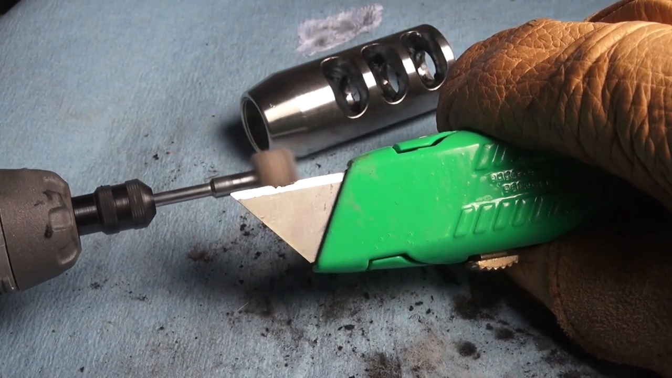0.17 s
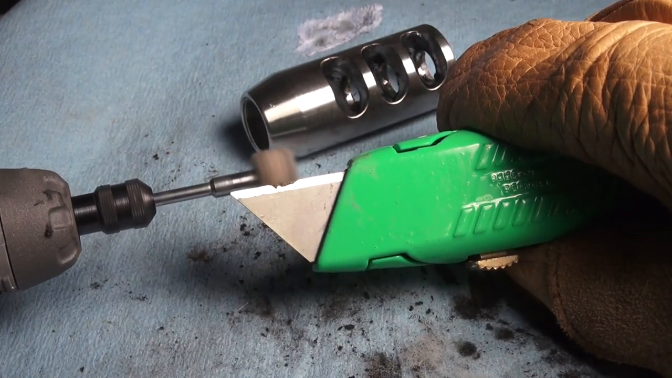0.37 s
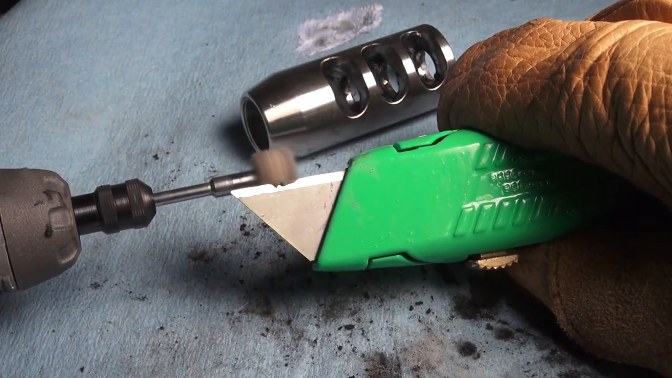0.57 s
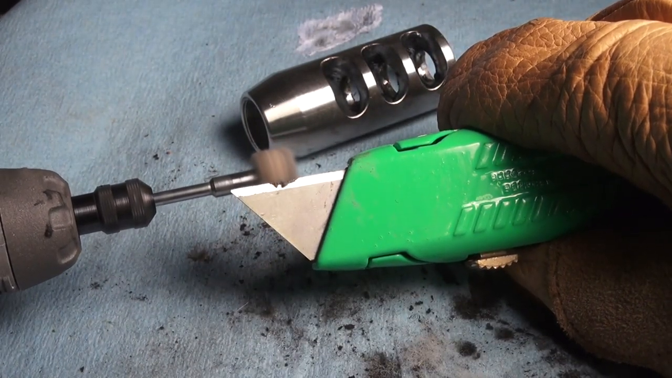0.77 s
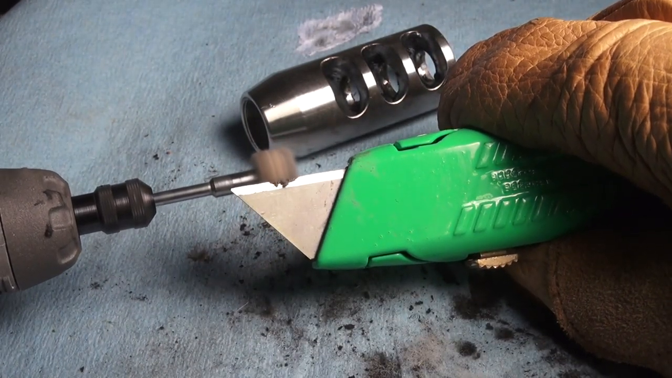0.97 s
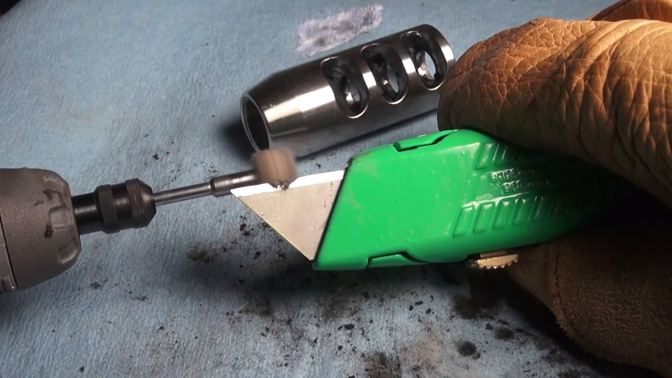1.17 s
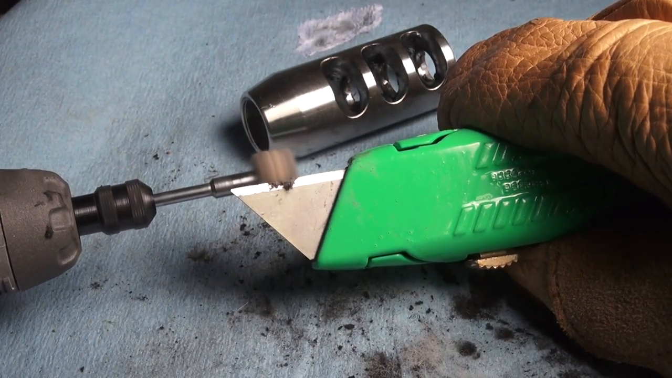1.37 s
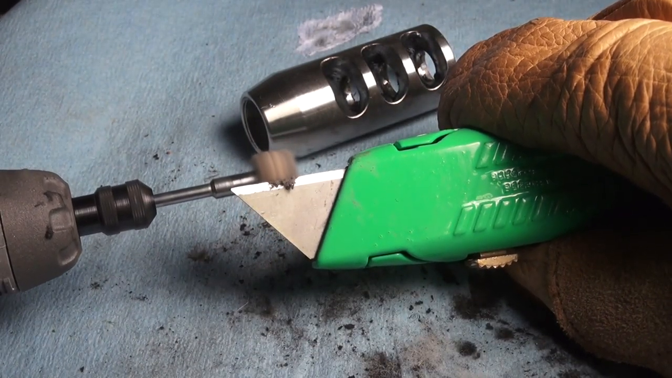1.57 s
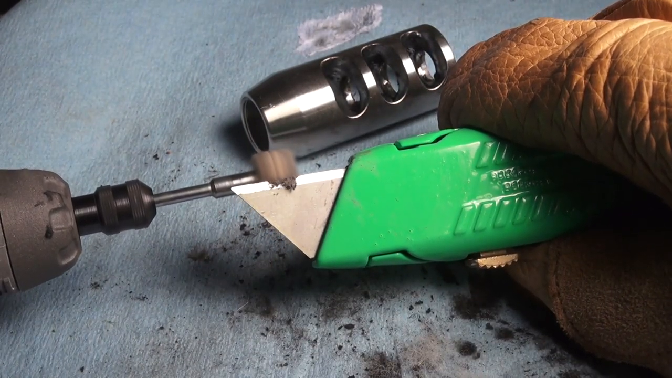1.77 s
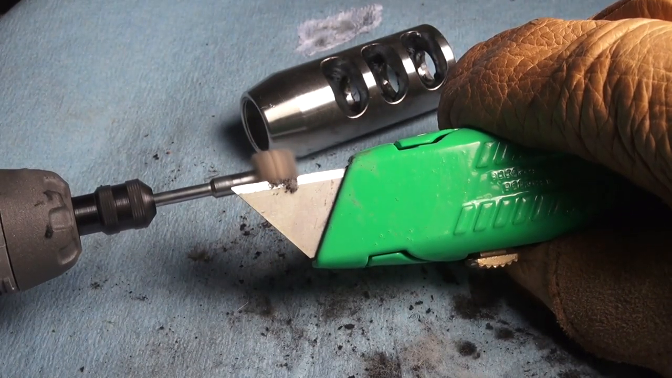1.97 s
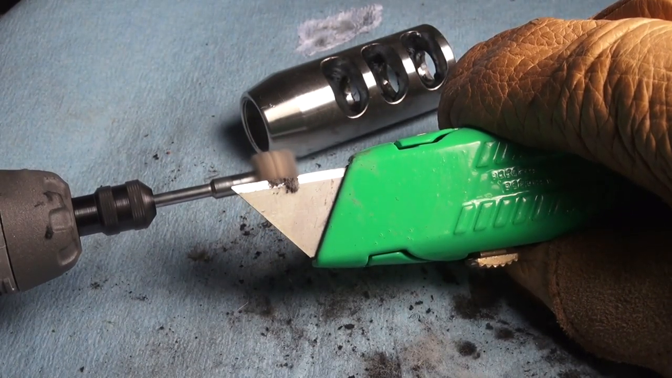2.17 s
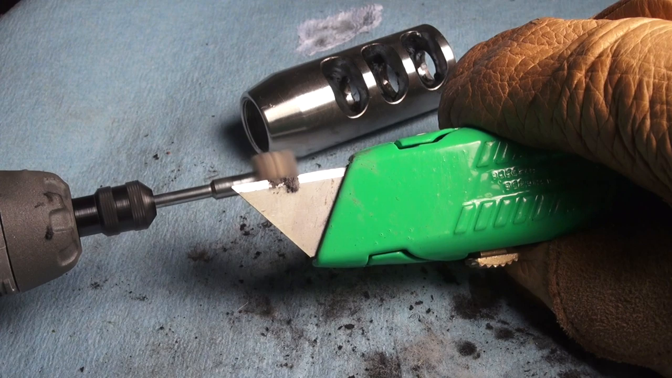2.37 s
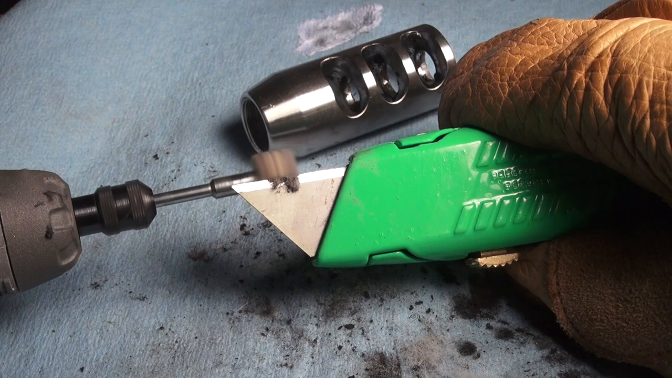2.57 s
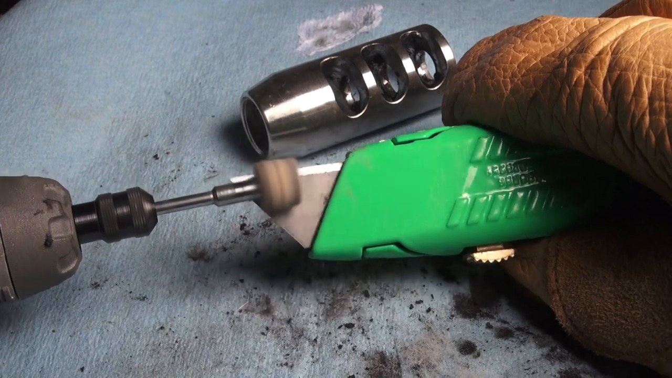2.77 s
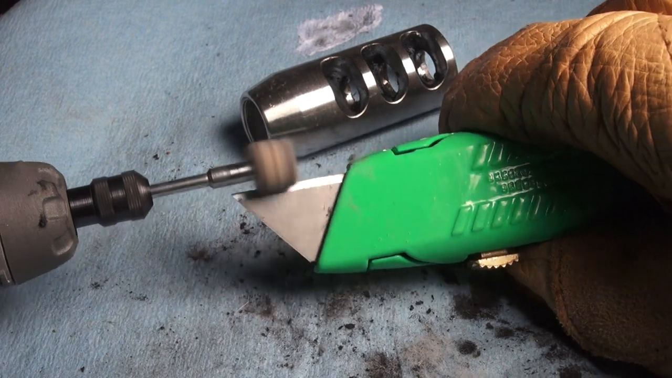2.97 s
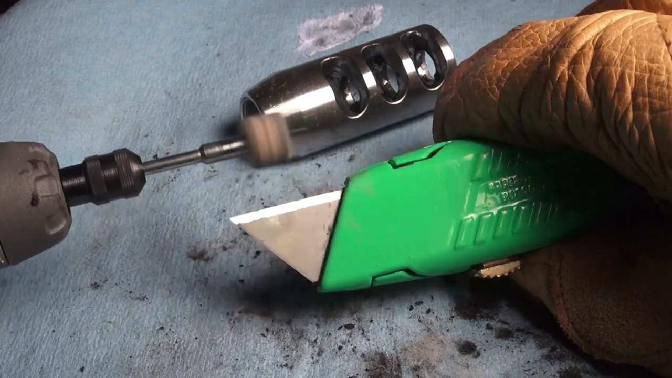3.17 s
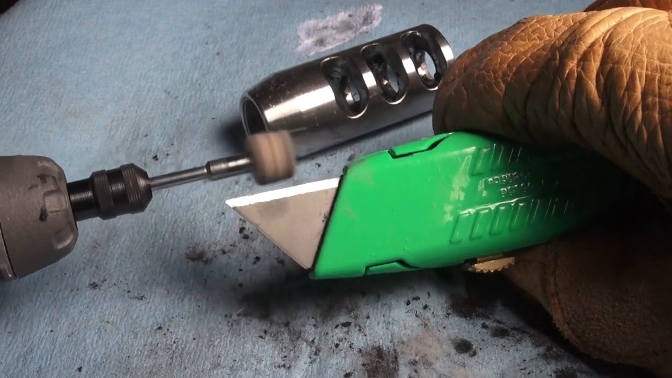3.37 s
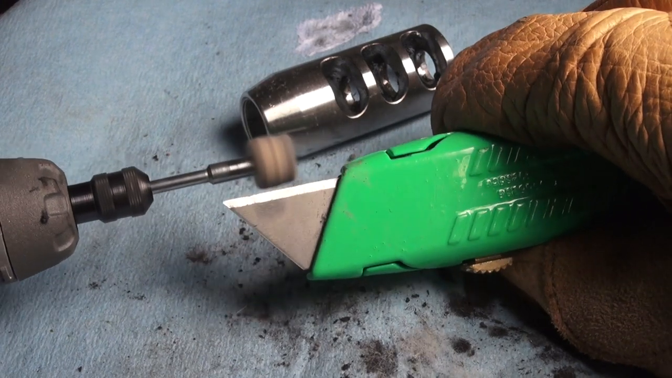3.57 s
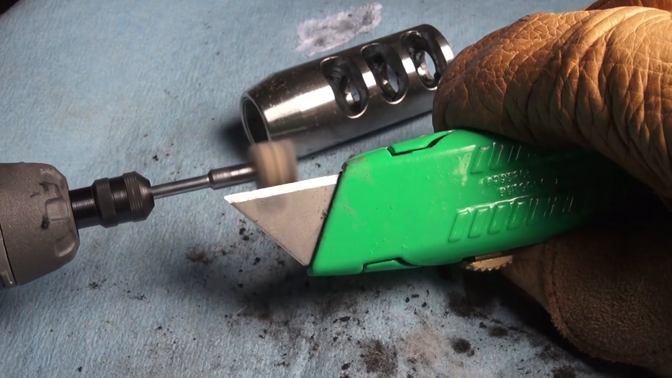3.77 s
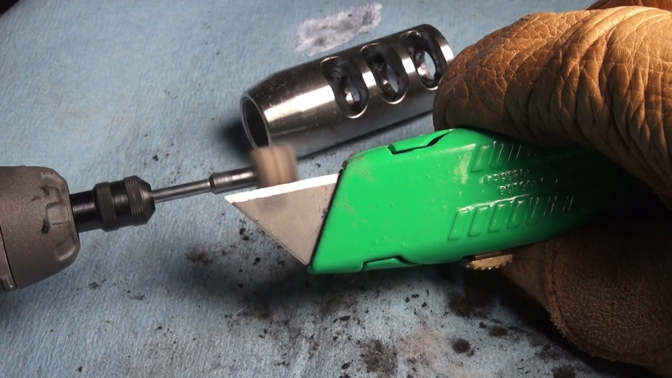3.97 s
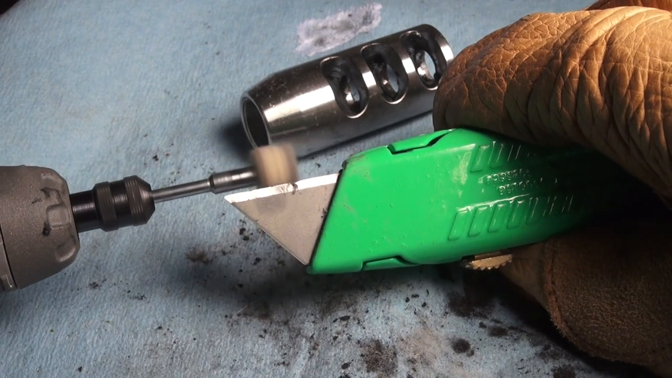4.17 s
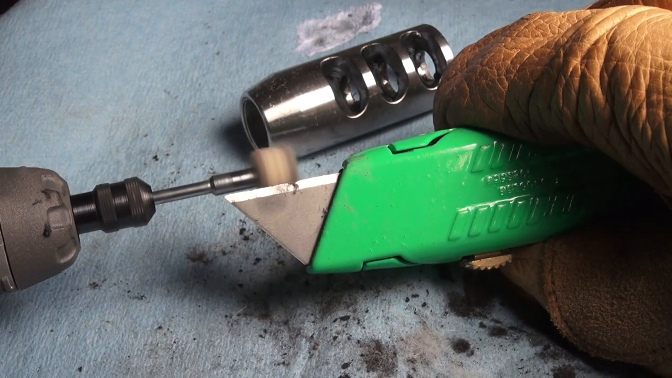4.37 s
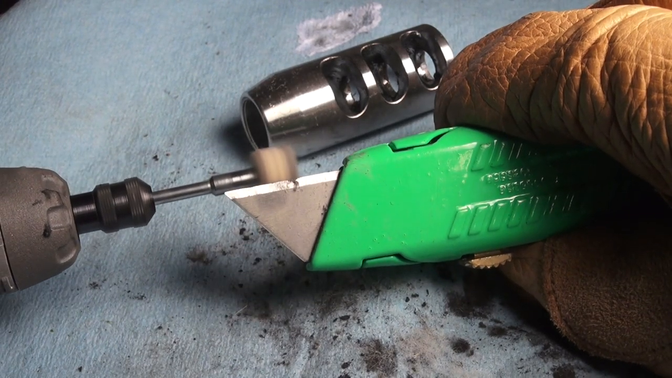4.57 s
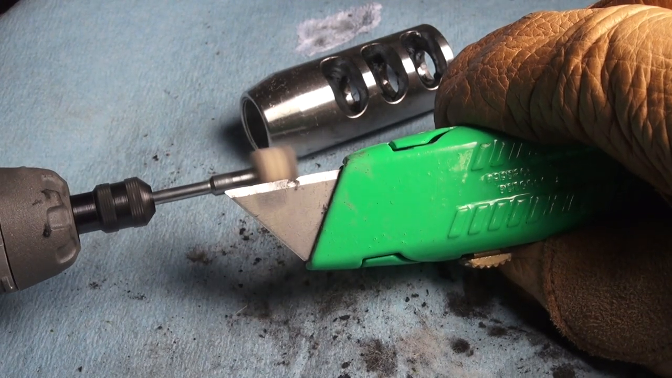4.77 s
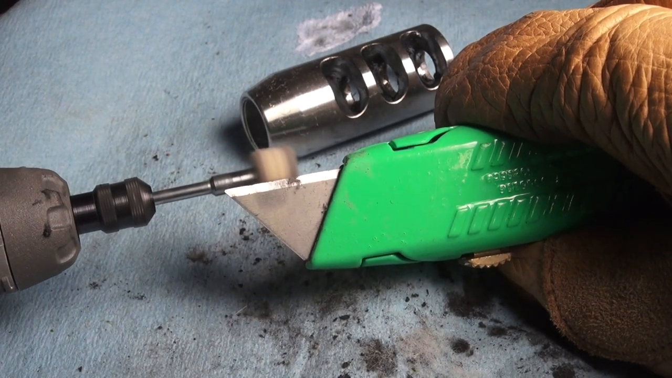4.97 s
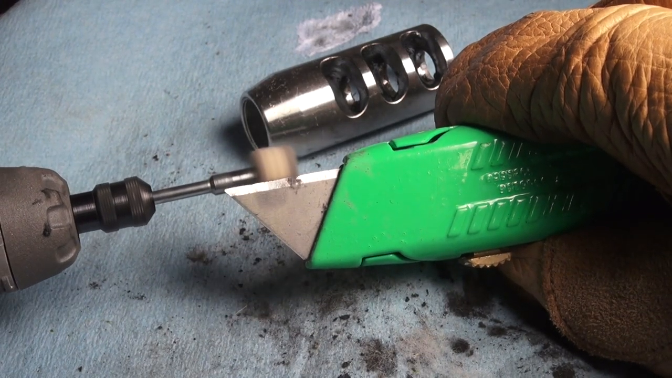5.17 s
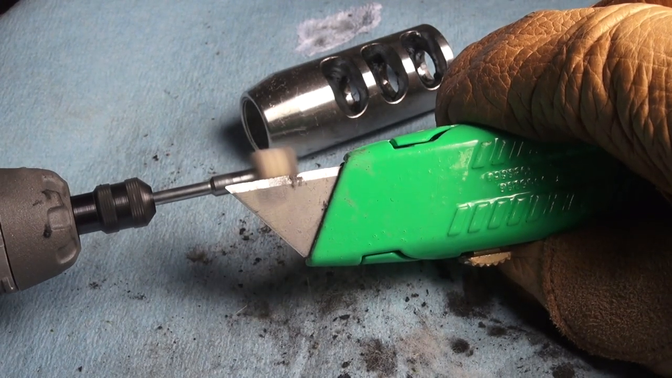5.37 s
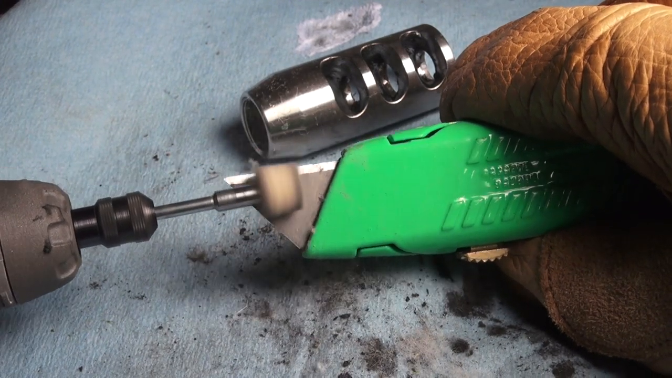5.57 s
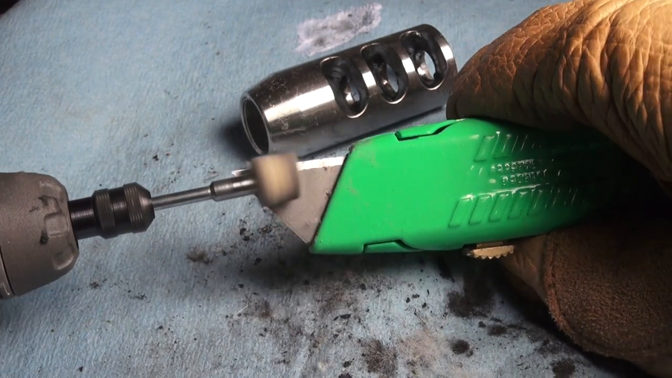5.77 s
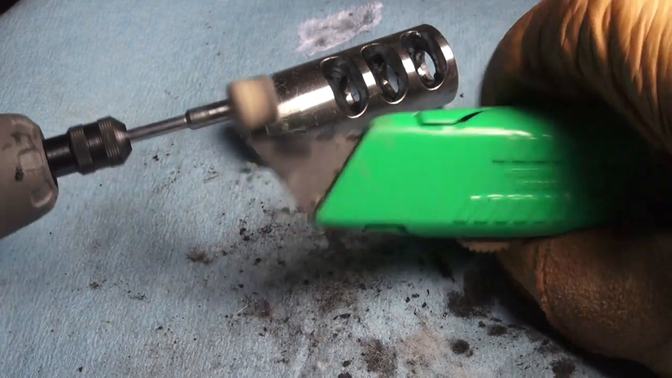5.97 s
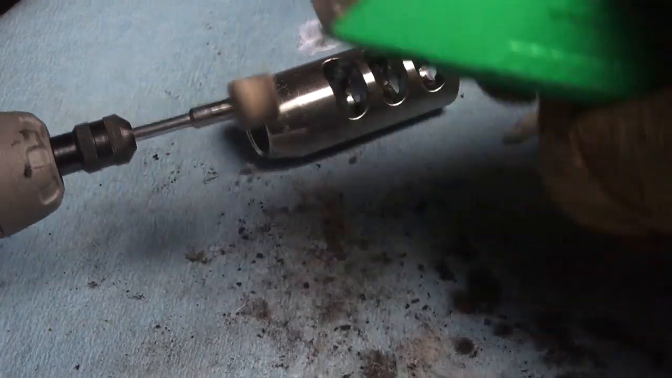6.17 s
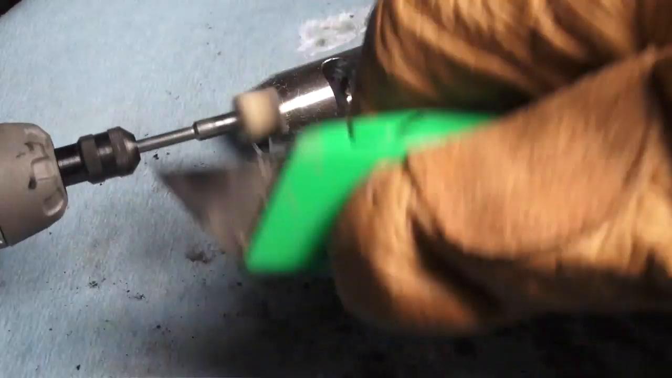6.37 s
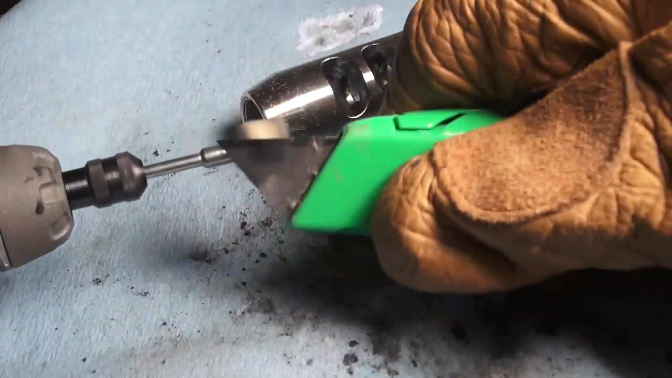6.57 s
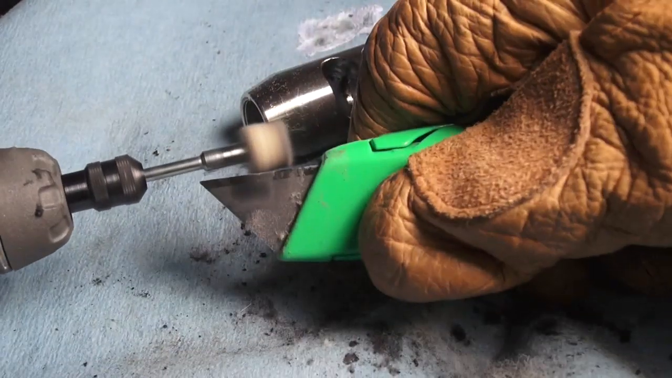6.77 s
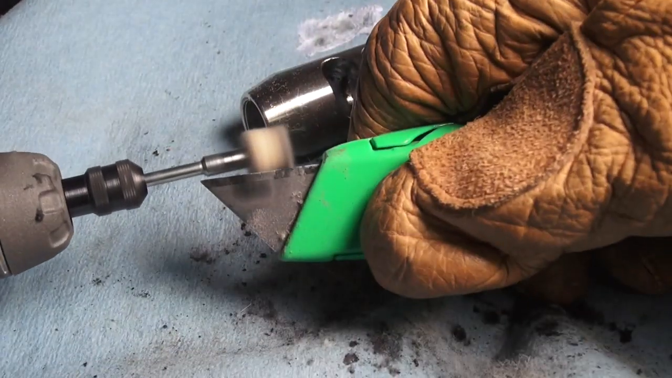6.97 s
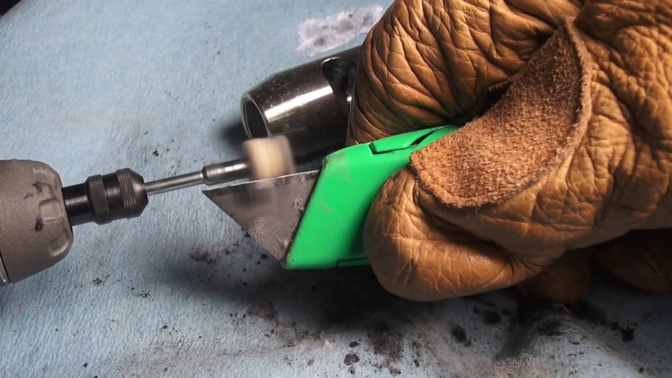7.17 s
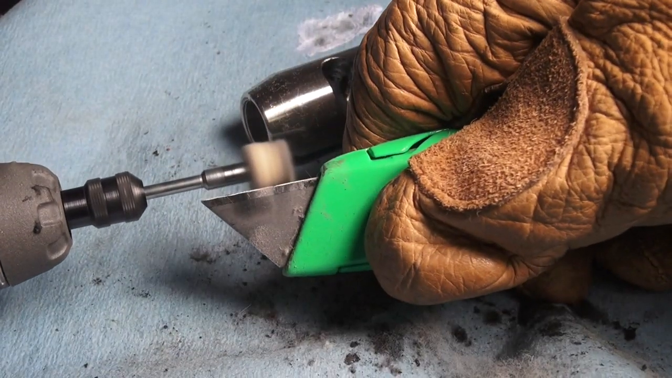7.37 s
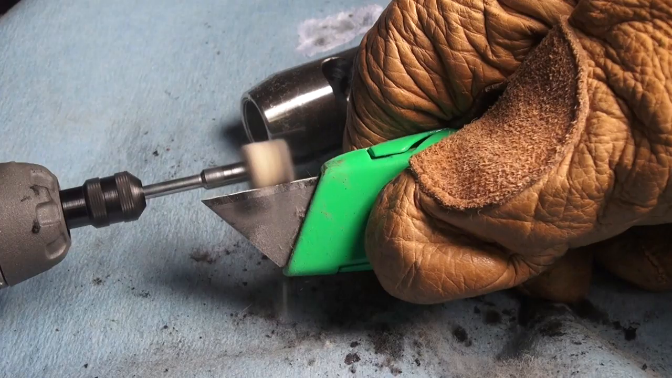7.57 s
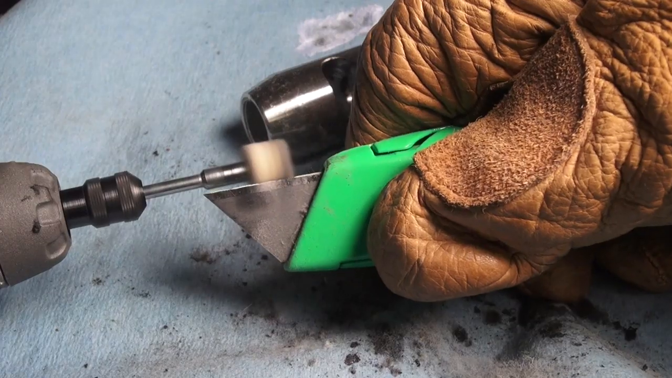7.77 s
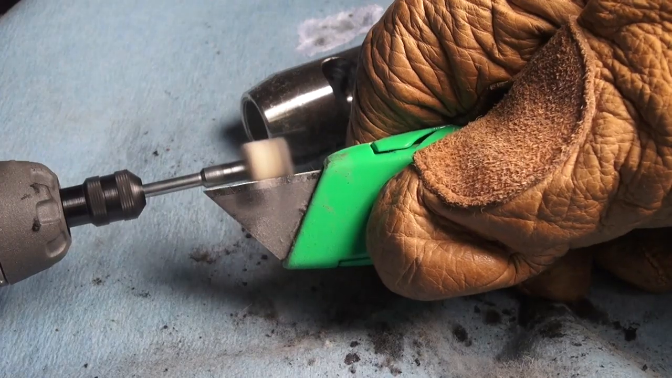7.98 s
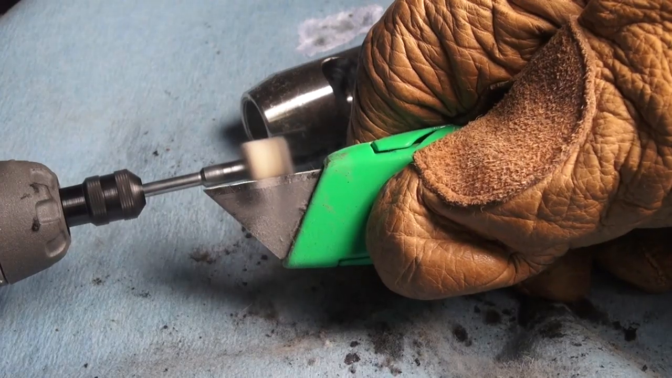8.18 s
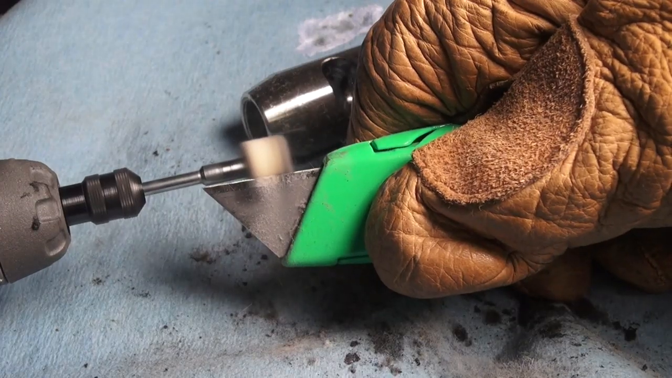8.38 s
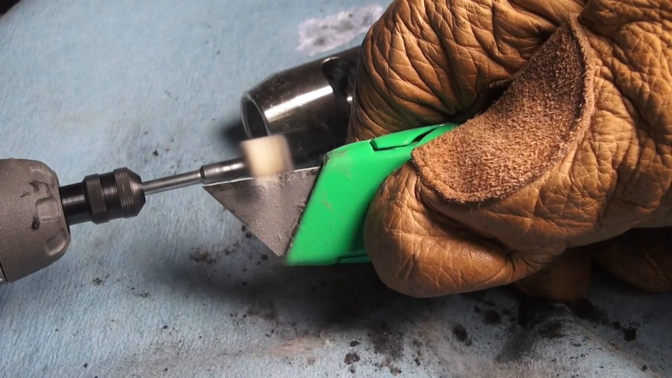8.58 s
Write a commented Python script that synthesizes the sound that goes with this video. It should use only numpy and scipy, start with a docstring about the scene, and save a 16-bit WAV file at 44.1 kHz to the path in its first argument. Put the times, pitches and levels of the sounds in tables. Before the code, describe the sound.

A small rotary tool whines at high speed while its spinning felt bob buzzes and rasps on a thin steel blade, grabbing harshly twice.

```python
"""A mains rotary tool spins a felt bob on a workbench, left of the microphone, against a hand-held knife blade.
The felt's high spot strikes and rasps the blade once a turn; the shaft sags under load and the bob grabs hard twice.
Between strokes the motor whines freely over mains hum and fan noise, and the knife clicks as it is turned over.
The bench rumbles faintly and thuds; the sound spreads left and right, with its highest treble centred."""
import sys
import numpy as np
from scipy import signal
from scipy.fft import rfft, irfft, next_fast_len
from scipy.io import wavfile
from scipy.ndimage import map_coordinates

SR = 44100
rng = np.random.default_rng(int(sys.argv[2]) if len(sys.argv) > 2 else 0)


def transcribe(u):
    """Save the signal u as a 16-bit wav file named by the first command-line argument.

    u: samples, shape (n,) or (channels, n), limited to [-1, 1]; the rate is SR.
    q: integer samples, one column per channel.
    """
    v = np.clip(np.atleast_2d(u).T, -1, 1)
    q = np.round(v * 32767).astype(np.int16)
    wavfile.write(sys.argv[1], SR, q)


N = 381024

# Levels are those at the source, before placing; rms levels are centres where a drift is added.
# speed of the shaft: [t/s, turns per s]
SHAFT_SPEED = [(0.0, 130.8), (0.24, 129), (0.34, 130.2), (0.44, 130.9), (0.52, 130.1), (0.65, 129.6),
               (0.8, 130.4), (0.87, 129.1), (0.96, 128.8), (1.02, 129.4), (1.07, 129.2), (1.12, 129.6),
               (1.27, 129.3), (1.37, 127.2), (1.44, 126.8), (1.51, 127.3), (1.6, 128.8), (1.66, 129.1),
               (1.75, 128.8), (1.83, 128.9), (1.94, 128.5), (2.01, 127.6), (2.09, 127.3), (2.17, 126.4),
               (2.21, 126.5), (2.29, 126.1), (2.36, 126.9), (2.42, 127.1), (2.47, 127.8), (2.73, 128),
               (2.78, 127.6), (2.84, 126.2), (2.89, 116.3), (2.91, 115.2), (2.93, 118.2), (2.98, 118.7),
               (3.07, 115.9), (3.15, 120.3), (3.22, 126.8), (3.3, 130.1), (3.44, 131.7), (3.66, 132.1),
               (4.11, 132.2), (4.21, 130.4), (4.28, 128.2), (4.31, 126), (4.35, 125.8), (4.4, 126.8),
               (4.45, 130), (4.57, 132.3), (4.64, 132.8), (4.86, 131.9), (4.98, 129.6), (5.03, 128.4),
               (5.13, 128), (5.21, 130.6), (5.35, 127.3), (5.42, 127.5), (5.53, 129), (5.59, 129),
               (5.63, 128.3), (5.68, 117.2), (5.7, 114.6), (5.77, 116.2), (5.85, 114.6), (5.92, 116.8),
               (6.04, 126.8), (6.16, 131.2), (6.23, 131.7), (6.44, 131.7), (6.62, 132.6), (7.2, 132.8),
               (7.25, 131.2), (7.32, 130.7), (7.48, 132.5), (7.6, 132.3), (7.65, 129), (7.77, 126),
               (7.87, 128.3), (8.02, 131.2), (8.13, 127.4), (8.23, 128.9), (8.32, 127.3), (8.38, 125),
               (8.43, 124.8), (8.54, 120.8), (8.64, 121.6)]
# commutator whine: [t/s, whine level/dB rms, octave level/dB rms]
WHINE = [(0.0, -25, -36), (0.24, -24, -34), (0.46, -25, -36.5), (0.7, -24.5, -33), (0.96, -23, -37),
         (1.2, -23, -37), (1.45, -23.5, -35), (1.8, -28.5, -48), (2.0, -28.5, -41), (2.24, -28, -38),
         (2.4, -28, -31), (2.6, -23.5, -30), (2.85, -23.5, -27), (2.89, -29, -50), (2.94, -19, -38),
         (3.0, -21, -42), (3.08, -25, -46), (3.22, -26.5, -36.5), (3.44, -30, -33), (3.66, -26.5, -34.5),
         (4.2, -27.5, -37), (4.36, -27, -45), (4.42, -30, -35), (4.6, -32, -39.5), (4.8, -30.5, -37),
         (4.92, -34, -37), (5.02, -30.5, -33), (5.1, -31, -38), (5.2, -28, -31), (5.27, -25, -25),
         (5.32, -26, -34), (5.4, -27.5, -26), (5.53, -27.5, -30), (5.62, -25, -33), (5.7, -29, -50),
         (5.77, -25, -49), (5.85, -31, -54), (5.93, -25, -36), (6.16, -28, -37), (6.23, -39, -39),
         (6.33, -42, -31), (6.45, -24.5, -33.5), (6.64, -31.5, -40), (6.88, -27.5, -33),
         (7.2, -29.5, -32.5), (7.6, -26.5, -33.5), (8.3, -29.5, -32.5), (8.45, -26, -36),
         (8.64, -21.5, -34)]
COMMUTATOR_BARS = 16
# shaft orders beside the whine, which grow as the shaft sags: [multiple of shaft speed, relative level/dB]
WHINE_NEIGHBOURS = [(17, -2), (18, 0.5), (19, -24), (20, -5)]
NEAR_DB, NEAR_DB_PER_SAG, FREE_TURNS_PER_S = -38.5, 0.47, 130.8  # sag in turns per s
# other shaft orders of the motor: [multiple of shaft speed, level/dB rms]
SHAFT_ORDERS = [(21, -55), (23, -40.5), (24, -43.5), (28, -50.5), (29, -56), (30, -51.5), (31, -52.5),
                (33, -44.5), (34, -48.5), (36, -44), (48, -48.5)]
# hum of the windings: [f/Hz, level/dB rms]
MAINS_HUM = [(120, -43.5), (240, -36.5), (360, -47), (480, -46), (600, -51.5), (720, -49.5)]
# spectrum of the brushes on the armature: [f/Hz, relative level/dB per Hz]
BRUSH_SPECTRUM = [(2500, -23), (3800, -11), (5500, -4.5), (6600, -5), (7600, -21), (8400, -18),
                  (10000, -30), (13000, -29)]
# spectrum of the cooling air: [f/Hz, relative level/dB per Hz]
FAN_SPECTRUM = [(60, -40), (120, -10.5), (180, -31.5), (240, -14), (300, -24.5), (600, -14.5), (950, -13),
                (1300, -14.5), (1750, -12.5), (2050, -10.5), (2400, -12), (3300, -19), (5000, -19.5),
                (8000, -31), (12500, -40)]

# strokes on the felt, one list each:
# [t/s, rasp level/dB, ringing edge level/dB, blade knock level/dB, tool knock level/dB], all relative
STROKES = [
    [(0.0, -46, -42, -27, -43), (0.03, -42, -36, -32, -56), (0.06, -37, -36.5, -20.5, -36),
     (0.25, -37, -26, -19, -36.5), (0.32, -42, -35, -28, -40), (0.42, -42, -33.5, -26.5, -43),
     (0.48, -38, -29.5, -21.5, -37.5), (0.64, -37, -28.5, -20, -35.5), (0.69, -42, -28.5, -26.5, -36),
     (0.79, -40, -29, -22.5, -37), (0.85, -37.5, -24, -19.5, -34), (1.11, -40, -29, -26, -36),
     (1.18, -39.5, -29.5, -28.5, -34), (1.46, -35, -30.5, -24, -29.5), (1.51, -41, -34, -28.5, -33),
     (1.81, -40.5, -30.5, -29.5, -35.5), (2.01, -37.5, -31, -25.5, -32.5), (2.33, -36, -30.5, -24.5, -32.5),
     (2.38, -40, -36, -28, -43), (2.41, -39.5, -32, -26, -30.5), (2.58, -37, -27, -30, -36),
     (2.67, -40, -31, -30, -34), (2.71, -34, -25, -31.5, -36), (2.83, -35.5, -24, -26, -29),
     (2.87, -25, -21, -15, -29), (2.9, -34, -27, -24, -27), (2.93, -31, -23, -27, -29),
     (2.98, -48, -44, -25, -31), (3.02, -31, -23, -18, -34), (3.13, -27, -17.5, -23, -23),
     (3.15, -28, -23, -29, -29), (3.16, -36, -31, -37, -43), (3.18, -56, -40, -58, -45),
     (3.2, -60, -37, -46, -52)],
    [(4.09, -51, -47, -53, -43), (4.104, -53, -43, -50, -39), (4.124, -41, -35, -38, -52),
     (4.142, -27.5, -22, -28, -32), (4.17, -37, -25, -28, -31), (4.208, -35, -33, -32, -33),
     (4.284, -30, -23.5, -18, -33.5), (4.39, -35, -24, -20, -37), (4.428, -56, -46, -40, -52),
     (4.45, -59, -45, -48, -51)],
    [(4.66, -49, -39, -42, -52), (4.666, -51, -38, -41, -48), (4.734, -37, -37, -27, -37),
     (4.802, -43, -30, -31, -41), (4.914, -35, -32, -20, -32), (5.122, -34, -32, -20, -28),
     (5.156, -44.5, -36, -28, -43), (5.232, -33, -38, -25.5, -29), (5.288, -33.5, -24, -22.5, -26.5),
     (5.524, -34.5, -28, -29, -27), (5.544, -32.5, -25, -36, -23), (5.662, -28, -13.5, -16.5, -28.5),
     (5.698, -30, -20, -33, -20), (5.73, -39, -26, -26, -27.5), (5.85, -46, -25, -38, -27),
     (5.89, -29.5, -21, -20, -25), (5.906, -32.5, -18.5, -31, -25), (6.042, -32.5, -23, -29, -36),
     (6.066, -49, -47, -52, -63), (6.09, -52, -38, -47, -51)],
    [(6.83, -61, -54, -46, -44), (6.856, -39.5, -30, -39, -46), (6.89, -60, -54, -49, -38)],
    [(7.19, -63, -54, -49, -52), (7.218, -34, -28, -34, -45), (7.23, -37, -18.5, -32, -48),
     (7.348, -40, -24.5, -31, -55), (7.386, -53, -40, -53, -54), (7.41, -63, -47, -39, -52)],
    [(7.56, -53, -40, -40, -48), (7.595, -39, -31, -29, -50), (7.598, -34, -16, -23, -52),
     (7.608, -35, -24, -26, -50), (7.64, -31, -18, -23.5, -35), (7.68, -35.5, -22.5, -25.5, -45),
     (7.778, -32.5, -18.5, -23, -30), (7.796, -37, -22, -22, -51), (7.832, -38.5, -30, -29.5, -52),
     (7.896, -36, -21.5, -24.5, -40), (7.96, -43, -34, -34, -46), (8.01, -46, -36, -31, -53),
     (8.058, -32.5, -16.5, -18.5, -40), (8.104, -35, -18.5, -18, -33), (8.148, -39.5, -22.5, -24.5, -42),
     (8.272, -36.5, -16.5, -19.5, -37), (8.35, -33.5, -24, -18, -35), (8.386, -32.5, -16, -18, -36),
     (8.42, -35, -20, -24, -35), (8.492, -33, -16, -21, -34), (8.64, -37, -21, -23, -28.5)],
]
# ways of holding the blade to the felt, all relative level/dB: [heel, belly, tip over the ringing edge;
# middle, root, shoulder over the rasp; spine, flex, bend, twist, point over the blade knock;
# collet, mandrel, handle, shell over the tool knock]
GRIPS = [(-19, -6, 0.5, 1, -1, -17, -29, -10.5, -7, -6, -26, -2, -14, -3, -22),
         (-13, 0, -3, 4, 2.5, -15, -10.5, -13, -10, -4, -24, -1.5, -18, -7.5, -12),
         (-5, -2.5, -5.5, 0, -2, -6, -13, -2, -4, -2.5, -22, -1, -24, -8.5, -19),
         (-12, -5, -6, 4, 0, 0.5, -15, -0.5, -2.5, -4.5, -14, -5, -11, -10, -24),
         (-15, -9.5, -9, 14, 5.5, -0.5, -4, -4, -5, -2.5, -3, -1.5, -8, -21, -21),
         (-6.5, -5.5, -8, 2, 3, 2.5, -12, -7, -7.5, -7, -16, -14, -1.5, -30, -17),
         (-9.5, -4, -6, -5, -10, -17, -27, -7.5, -5, 0, -17, -17, -21, -1.5, -16),
         (-8, -5, -1.5, -1, 3, -22, -17, -16, 0.5, -3.5, -21, -15, -9, -2.5, -5),
         (-7, 2, -6, 1, 0.5, -10, -25, -7.5, -9, -0.5, -11, -6, -21, -6, -18),
         (-8, -1, -7, -1, 2, 3, -10, -3, -2, -1.5, -8, -3.5, -12.5, -11.5, -16),
         (-8, -11.5, 0, -24, -21, -4, -21, -0.5, 0.5, -7, -10, -26, -26, -4, -15),
         (-11.5, -8.5, -2, -19, -16, -20, -24, -1, -3.5, -3, -20, -25, -23, -2.5, -5),
         (-13, -14, -1.5, -21, -18, -14, -25, 0.5, -1, -16, -5.5, -27, -16, -3, -6),
         (-8, -10, -12, 3, 7, 2.5, -11, -5, -9, -0.5, -14, -10, -2, -30, -29),
         (-12, -8.5, -9, 5.5, 0, 1, -5, -2.5, -3, -2, -2, 0, -9.5, -21, -21)]
# grip in use, blended from one to the next: [t/s, row of the four lists of grips]
HOLD = [(.65, 0), (.9, 1), (1.25, 1), (1.36, 2), (2.0, 2), (2.2, 3), (2.4, 3), (2.52, 4), (2.82, 4),
        (2.88, 5), (3.06, 5), (3.1, 13), (3.2, 13), (4.0, 6), (4.5, 6), (4.6, 7), (4.85, 7), (4.95, 8),
        (5.15, 8), (5.25, 9), (5.55, 9), (5.59, 14), (5.64, 14), (5.69, 5), (5.96, 5), (5.99, 13),
        (6.1, 13), (6.5, 10), (7.95, 10), (8.05, 11), (8.25, 11), (8.4, 12)]
# for each grip: [share of freshly torn fibre, before pressure and grabs add to it, 0-1]
TORN = [.03, .03, .1, .03, 0, .12, .4, .03, .2, .05, .35, .3, .4, .3, .05]
# for each grip: [turn-to-turn scatter of the rasp/dB]
CHATTER_DB = [.5, .5, 1, .5, .8, 1.2, 3.6, .5, 2, .5, 1.6, 1.4, 1.8, 1.8, .8]
# for each grip: [how far the blade leaves the felt between blows, 0-1]
FLUTTER = [.15, .15, .1, .2, .4, .75, .3, .1, .2, 0, .1, .1, .1, .45, .2]
MODE_DRIFT_DB, IDLE_DB = 1.4, -50  # random drift of each mode; floor of collet and mandrel
# the bob catches and skips: [t/s, length/s, strength 0-1]
GRABS = [(2.852, 0.063, 0.96), (3.092, 0.075, 0.08), (4.117, 0.0372, 0.4), (5.639, 0.062, 0.9)]
GRAB_EDGE_S = 0.0188
TURNED_S = 6.5  # the other face meets the felt from here
# the bent mandrel's shake: [t/s, level/dB rms]
SHAKE = [(0.0, -47), (0.04, -47), (2.76, -52), (2.81, -53), (2.89, -16.5), (3.01, -30), (3.08, -22),
         (3.15, -32), (3.34, -50), (5.58, -48), (5.7, -25), (5.75, -44), (5.97, -34), (6.18, -58),
         (6.26, -51), (8.37, -52), (8.49, -41), (8.64, -53)]
# Resonances, each a list of [f/Hz, width of the narrower section/Hz, relative level/dB].
# ringing edge at heel, belly and tip; then the other face, held differently
EDGE = [(4780, 160, 0)], [(5400, 200, 0)], [(5740, 260, 0)]
EDGE_TURNED = [(4740, 81, -1), (5010, 100, 0)], [(5270, 100, 0)], [(5615, 96, -2), (6060, 320, -11.5),
               (7260, 100, -20)]
# blade modes that the rasp drives
MIDDLE, ROOT, SHOULDER = [(3934, 230, -0.76), (4290, 126, -0.24)], [(3273, 310, 0)], [(6850, 610, 0)]
# low blade modes that the high spot knocks
SPINE, FLEX, BEND = [(1302, 146, 0)], [(1560, 85, 0)], [(1697, 112, 0)]
TWIST, POINT = [(1834, 140, 0)], [(2131, 74, 0)]
# tool modes that the high spot knocks
COLLET, MANDREL = [(1067, 71, 0)], [(742, 83, -0.42), (865, 120, -0.58)]
HANDLE, SHELL = [(512, 70, 0)], [(619, 54, 0)]
# spectrum of fibres tearing: [f/Hz, relative level/dB per Hz]
RASP_SPECTRUM = [(2000, -19.5), (4000, -11.5), (5500, -4), (6600, -11.5), (8000, -13.5), (9000, -15),
                 (10000, -18), (11200, -15.5), (11550, -7), (11800, -12), (12050, -8.5), (12400, -13),
                 (15500, -35)]

# thuds of the bench: [t/s, relative level/dB]
BENCH_THUDS = [(2.87, -37), (4.25, -48), (4.34, -48), (5.65, -50), (6.8, -50), (7.0, -57), (8.6, -53)]
THUD_RISE_S, THUD_T60_S, RUMBLE_DB = 0.02, 0.4, -65
# spectrum of rumble and thuds: [f/Hz, relative level/dB per Hz]
THUD_SPECTRUM = [(20, 6), (40, -12), (85, -11), (110, -25), (200, -62)]
# clicks of the knife: [t/s, relative level of the click/dB, relative level of its body/dB]
KNIFE_CLICKS = [(6.2992, -10.5, -13.5), (6.3659, -17.5, -14), (6.421, -17, -29), (6.428, -14.5, -24),
                (6.4325, -19, -22), (6.6087, -7, -16)]
# partials of the loose blade: [f/Hz, relative level/dB, t60/s]
STEEL_PARTIALS = [(4350, 2, 0.027), (5120, 9.5, 0.036), (6600, -5, 0.1), (9500, -19, .03),
                  (11210, -13, .03), (12100, -16, 0.21)]

# lean of the sound, left over right: [f/Hz, level/dB]
LEFT_TOOL = [(100, -4), (250, 0.5), (380, 0.5), (700, 6), (2400, 8.5), (4400, 7), (8100, 12), (11000, 0)]
LEFT_BLADE = [(200, -1), (700, -1.5), (2000, 9.5), (4400, -1.5), (15000, 0.5)]
# left-right spread of the sound over frequency; the highest treble is centred: [f/Hz, relative level/dB]
SPREAD = [(100, -26), (300, -15), (700, -7), (1300, -9), (2500, -9), (7000, -13), (10500, -3), (11500, -35)]
# fall of the treble: [f/Hz, level/dB]
TREBLE_FALL = [(12000, -1), (12700, -6), (13200, -15), (14500, -19), (16000, -24)]
TOP_HZ = 15800


def amp(db):
    """Gain of a level in dB."""
    return 10 ** (np.asarray(db) / 20)


def unit(x):
    """x at rms 1."""
    return x / np.sqrt(np.mean(x ** 2) + 1e-20)


def along(points, hz):
    """Values between (f/Hz, value) points on a log frequency axis."""
    f, value = np.transpose(points)
    return np.interp(np.log(hz + 1), np.log(f + 1), value)


def curves(rows):
    """One value per sample for each column after the time."""
    s, *columns = np.transpose(rows)
    return [np.interp(np.arange(N) / SR, s, column) for column in columns]


def wobble(rate):
    """A random curve of straight lines between knots, rate knots a second."""
    knots = rng.standard_normal(int(N * rate / SR) + 4)
    return map_coordinates(knots, [np.arange(N) * rate / SR], order=1)


def filtered(x, response):
    """x through a complex response of frequency."""
    size = next_fast_len(N + 8192)
    return irfft(rfft(x, size) * response(np.fft.rfftfreq(size, 1 / SR)), size)[..., :N]


def shaped(x, spectrum):
    """x through a table of levels over frequency, at rms 1."""
    return unit(filtered(x, lambda hz: amp(along(spectrum, hz))))


def ring(x, resonances):
    """x through resonances at rms 1; two sections in series, one three times wider, give steep skirts."""
    def section(f, centre, width):
        return 1j * f * width / (centre ** 2 - f ** 2 + 1j * f * width)

    def response(f):
        total = 0
        for k, (centre, width, db) in enumerate(resonances):
            pair = section(f, centre, width) * section(f, centre, 3 * width)
            total = total + (-1) ** k * amp(db) * pair
        return total
    return unit(filtered(x, response))


def tone(turns):
    """A sine of rms 1 at a random phase."""
    return np.sqrt(2) * np.sin(2 * np.pi * (turns + rng.random()))


def rim(turns, wear, fresh):
    """A rim's roughness returns each turn, wearing to a new pattern wear times a second; a share is new."""
    spots = 336
    bumps = rng.standard_normal((int(N * wear / SR) + 3, spots + 1))
    again = map_coordinates(bumps, [np.arange(N) * wear / SR, turns % 1 * spots], order=1)
    fresh = np.clip(fresh, 0, 1)
    return np.sqrt(1 - fresh) * unit(again) + np.sqrt(fresh) * rng.standard_normal(N)


def high_spot(turns, sharp):
    """Contact force over a turn: a bump, narrower as sharp grows."""
    return np.exp(sharp * (np.cos(2 * np.pi * turns) - 1))


def whine(turns, drift):
    """Commutator bars sing at their passing rate and its octave, amid shaft orders that drift in strength."""
    (speed,), (whine_db, octave_db) = curves(SHAFT_SPEED), curves(WHINE)
    near_db = NEAR_DB + NEAR_DB_PER_SAG * (FREE_TURNS_PER_S - speed)
    out = amp(whine_db + 0.82 * wobble(40)) * tone(COMMUTATOR_BARS * turns)
    out += amp(octave_db + 2.5 * wobble(30)) * tone(2 * COMMUTATOR_BARS * turns)
    for k, (multiple, db) in enumerate(WHINE_NEIGHBOURS):
        out += amp(near_db + db + 3.2 * drift[k]) * tone(multiple * turns)
    for k, (multiple, db) in enumerate(SHAFT_ORDERS):
        out += amp(db + 3.1 * drift[k % 6]) * tone(multiple * turns)
    return out


def hum(drift):
    """The windings hum at steady mains harmonics that drift in strength."""
    t = np.arange(N) / SR
    return sum(amp(db + 0.98 * drift[k % 6]) * tone(hz * t) for k, (hz, db) in enumerate(MAINS_HUM))


def brushes(turns):
    """Brushes buzz on armature roughness that comes round nearly the same every turn."""
    return amp(-40) * shaped(rim(turns, wear=1.51, fresh=0.03), BRUSH_SPECTRUM)


def fan():
    """Cooling air is noise that pulses with the current, at the lowest hum frequency, and drifts in level."""
    t = np.arange(N) / SR
    pulse = 1 + 0.11 * np.cos(2 * np.pi * MAINS_HUM[0][0] * t)
    air = rng.standard_normal(N) * pulse * amp(1.4 * wobble(4.804))
    return amp(-31) * shaped(air, FAN_SPECTRUM)


def motor(turns):
    """Whine and hum share slow drifts, beneath brush buzz and fan noise."""
    drift = [wobble(5) for _ in range(6)]
    return whine(turns, drift) + hum(drift) + brushes(turns) + fan()


def modes():
    """Rasp level, then edge, rasp, blade and tool mode levels: each follows its stroke part and the grip."""
    rows = []
    for stroke in STROKES:
        before, after = stroke[0][0] - 0.01, stroke[-1][0] + 0.01
        rows += [(before, *[-90] * 4), *stroke, (after, *[-90] * 4)]
    rasp_db, edge_db, knock_db, tool_db = curves(rows)
    grips = curves([(s, *GRIPS[row]) for s, row in HOLD])
    drive = [edge_db] * 3 + [rasp_db] * 3 + [knock_db] * 5 + [tool_db] * 4
    levels = [d + grip + MODE_DRIFT_DB * wobble(12) for d, grip in zip(drive, grips)]
    return rasp_db, levels[:3], levels[3:6], levels[6:11], levels[11:]


def catch():
    """How firmly the bob is caught, 0-1, with ramps at both ends of each grab."""
    t = np.arange(N) / SR
    total = 0
    for start, length, strength in GRABS:
        inside = np.minimum(t - start, start + length - t)
        total = total + strength * np.clip(inside / GRAB_EDGE_S + 0.5, 0, 1)
    return np.clip(total, 0, 1)


def knock(blow, blade_dbs, tool_dbs):
    """The high spot's blow rings the low modes of blade and tool."""
    out = sum(amp(db) * ring(blow, mode) for db, mode in zip(blade_dbs, [SPINE, FLEX, BEND, TWIST, POINT]))
    collet_db, mandrel_db, handle_db, shell_db = tool_dbs
    out += (amp(collet_db) + amp(IDLE_DB)) * ring(blow, COLLET)
    out += (amp(mandrel_db) + amp(IDLE_DB)) * ring(blow, MANDREL)
    return out + amp(handle_db) * ring(blow, HANDLE) + amp(shell_db) * ring(blow, SHELL)


def scraped_edge(scrub, struck, turned, edge_dbs, rasp_dbs):
    """Scrubbing fibres and blows ring the edge and upper blade; the turned edge rings from scrubbing alone."""
    out = 0
    for db, front, back in zip(edge_dbs, EDGE, EDGE_TURNED):
        out = out + amp(db) * np.where(turned, ring(scrub, back), ring(scrub + 1.2 * struck["uneven"], front))
    middle_db, root_db, shoulder_db = rasp_dbs
    out += amp(root_db) * ring(0.46 * struck["even"] + scrub, ROOT)
    out += amp(middle_db) * ring(1.1 * struck["uneven"] + scrub, MIDDLE)
    return out + amp(shoulder_db) * ring(0.4 * struck["uneven"] + scrub, SHOULDER)


def blade(turns):
    """The felt's high spot knocks the low modes; the fibres around it tear and rasp the high ones."""
    rasp_db, edge_dbs, rasp_dbs, blade_dbs, tool_dbs = modes()
    shake_db, = curves(SHAKE)
    grab, turned = catch(), np.arange(N) > TURNED_S * SR
    held = turns - np.cumsum(9 * grab) / SR  # a catching bob is held back
    turns = held + np.cumsum(20 * grab * wobble(90)) / SR  # and meets the blade out of step

    # hard pressure tears fresh fibres, so less repeats from turn to turn
    torn, chatter_db, flutter = curves([(s, TORN[row], CHATTER_DB[row], FLUTTER[row]) for s, row in HOLD])
    cutting = np.clip((rasp_db + 37) / 24 + grab / 2 + torn, 0.04, 0.9)

    uneven = amp(0.8 * wobble(60))  # the strength of the bite varies
    rough = (0.13 + 0.5 * grab) * rim(turns, wear=4, fresh=cutting / 2)
    blow = uneven * (unit(high_spot(turns, 900)) + rough)

    # the fibres drag hardest just before the blow
    chatter = amp(chatter_db * wobble(110))
    sharp = np.where(turned, 1.3, 2.2) * (1 + 2 * flutter)
    pressure = 0.4 * (1 - flutter) + (1 + flutter) * high_spot(turns + 0.1, sharp)
    drag = uneven * chatter * pressure
    scrub = drag * rim(turns, wear=5, fresh=cutting)
    tear = (0.65 * (1 - flutter) + drag) * rim(turns, wear=6, fresh=cutting + 0.32) + 0.33 * blow

    out = knock(blow, blade_dbs, tool_dbs)
    out += amp(shake_db) * tone(held)  # the bent mandrel shakes the bench once a turn
    struck = {"even": blow, "uneven": chatter * blow}  # without and with the chatter
    out += scraped_edge(scrub, struck, turned, edge_dbs, rasp_dbs)
    return out + amp(rasp_db + 8.5) * shaped(tear, RASP_SPECTRUM)


def thud():
    """The bench rumbles faintly and thuds when the tool jolts; part of it differs from port to port."""
    t = np.arange(N) / SR
    level = amp(RUMBLE_DB)
    for s, db in BENCH_THUDS:
        since = np.clip(t - s, 0, None)
        level = level + amp(db - 60 * since / THUD_T60_S) * (1 - np.exp(-since / THUD_RISE_S))
    shared, own = rng.standard_normal(N), rng.standard_normal((2, N))
    return level * shaped(shared + 0.3 * own, THUD_SPECTRUM)


def knife():
    """Each click is a dry crack that rings the loose blade at new strengths, and the plastic body."""
    out, t = np.zeros(N + SR), np.arange(SR // 8) / SR
    for s, db, body_db in KNIFE_CLICKS:
        steel = 0
        for hz, level, t60 in STEEL_PARTIALS:
            strength = amp(level + 2 * rng.normal() - 60 * t / t60)
            blur = np.cumsum(rng.normal(0, 0.27, len(t)))  # wandering phase, rad
            steel = steel + strength * np.sin(2 * np.pi * hz * t + blur)
        crack = 0.8 * amp(-60 * t / 0.014) * np.diff(rng.standard_normal(len(t) + 1))
        body = amp(body_db + 14 - 60 * t / 0.05) * np.sin(2 * np.pi * 1310 * t)
        out[round(s * SR):][:len(t)] += amp(db - 11.5) * (steel + crack + body)
    return out[:N]


def place(x, left_db):
    """The sound leans by frequency; a short diffuse tail, opposite at the two ports, spreads it left and right."""
    t = np.arange(SR // 8) / SR
    tails = rng.standard_normal((2, len(t))) * amp(-60 * t / 0.17)
    pair = signal.fftconvolve(x[None], tails / np.linalg.norm(tails[0]), axes=1)[:, :N]
    # the spread shifts as the hands move
    angle = 2 * np.pi * np.cumsum(1.81 * wobble(3.02)) / SR
    mixed = pair[0] * np.cos(angle) + pair[1] * np.sin(angle)
    spread = filtered(mixed, lambda hz: amp(along(SPREAD, hz)))

    def lean(hz):
        return 2 / (1 + amp(along(left_db, hz) * np.array([[-1], [1]])))
    return filtered(x[None], lean) + spread * np.array([[1], [-1]])


def scene():
    """Tool, blade on felt, bench and knife clicks at the two ports."""
    turns = np.cumsum(curves(SHAFT_SPEED)[0]) / SR
    tool = place(motor(turns), LEFT_TOOL)
    return tool + place(blade(turns) + knife(), LEFT_BLADE) + thud()


def record(dry):
    """The sound falls away steeply above 12 kHz; nothing passes the band limit."""
    return filtered(dry, lambda hz: amp(along(TREBLE_FALL, hz)) * (hz < TOP_HZ))


dry = scene()
out = record(dry)
transcribe(out)
```